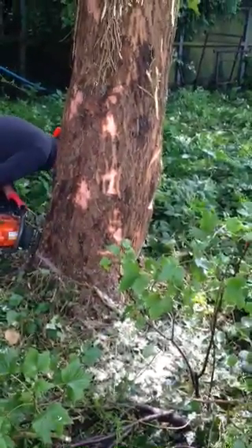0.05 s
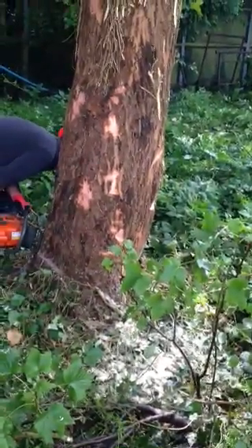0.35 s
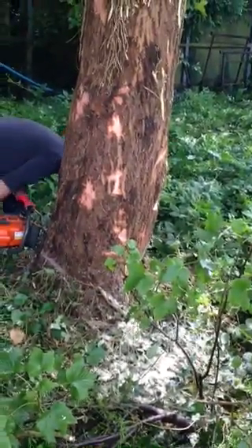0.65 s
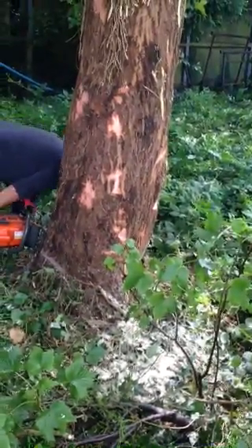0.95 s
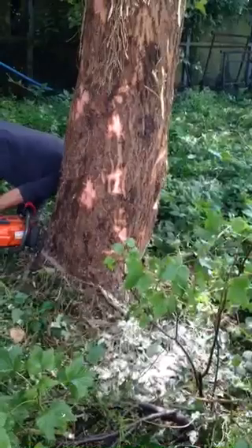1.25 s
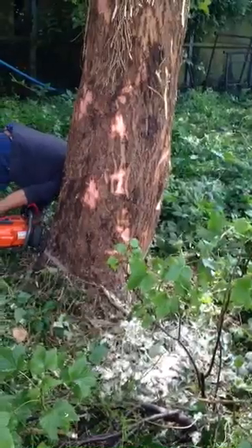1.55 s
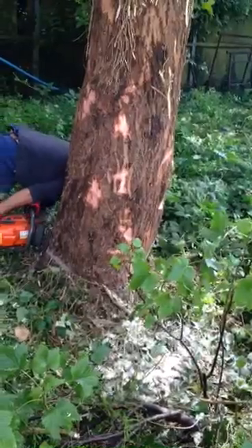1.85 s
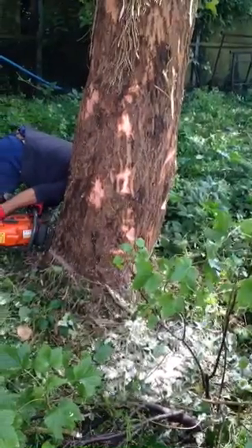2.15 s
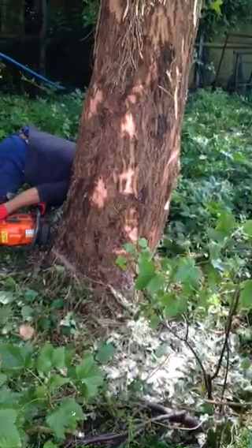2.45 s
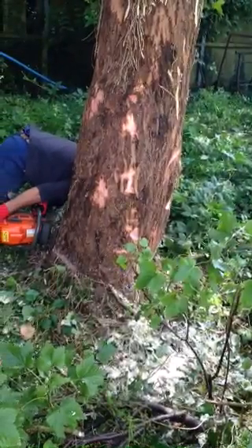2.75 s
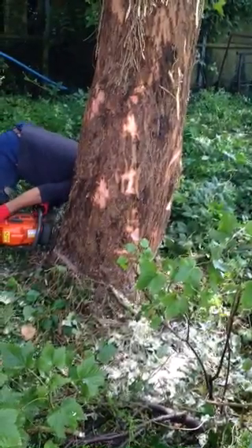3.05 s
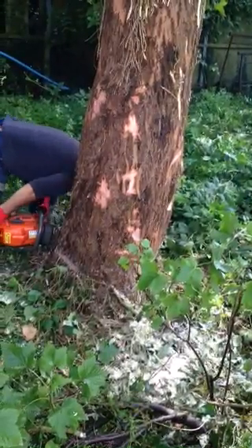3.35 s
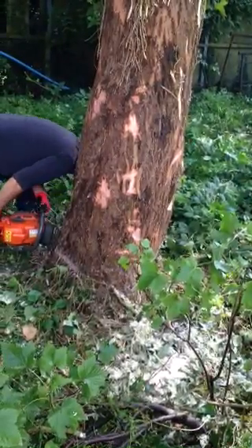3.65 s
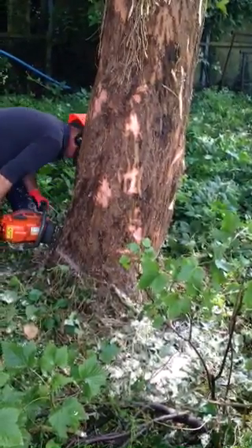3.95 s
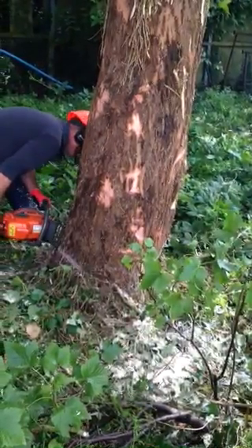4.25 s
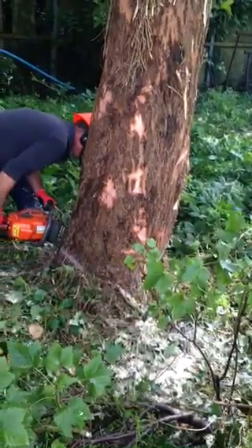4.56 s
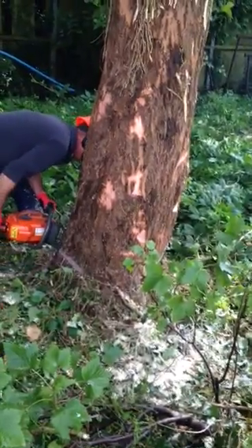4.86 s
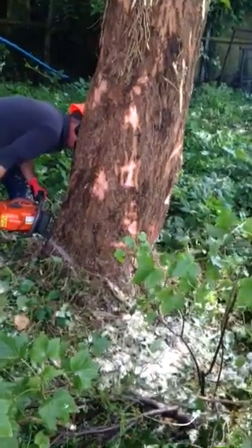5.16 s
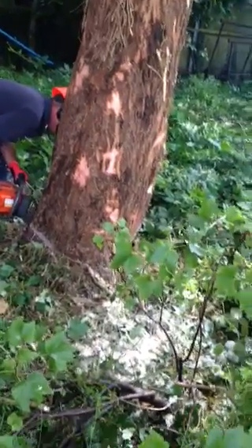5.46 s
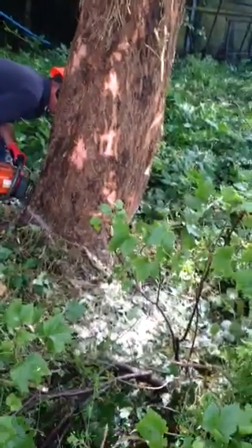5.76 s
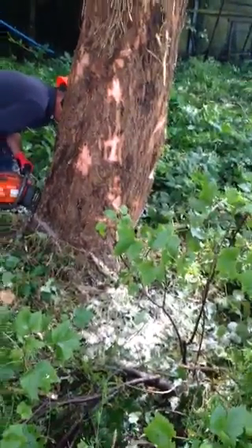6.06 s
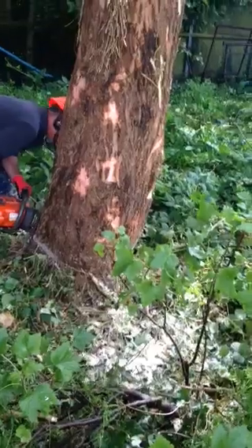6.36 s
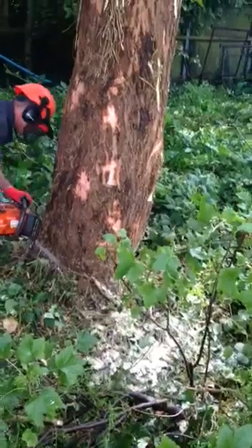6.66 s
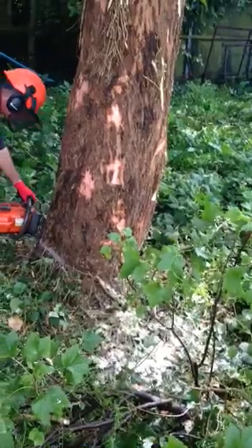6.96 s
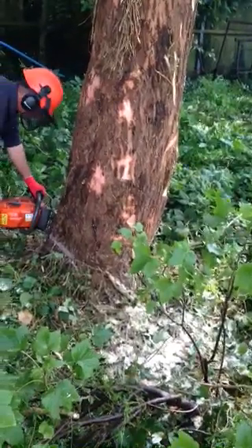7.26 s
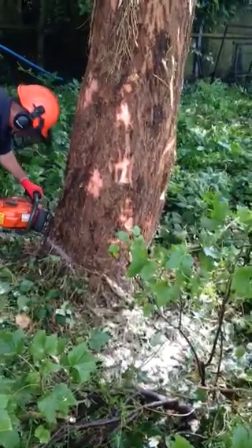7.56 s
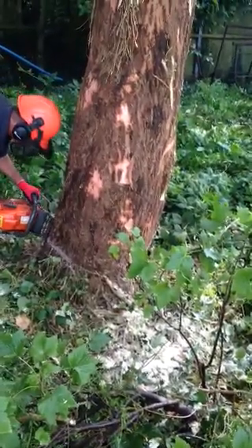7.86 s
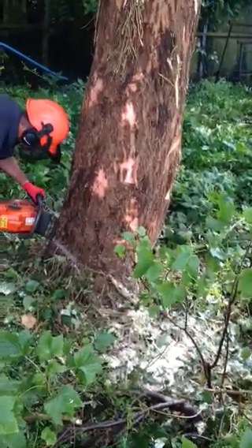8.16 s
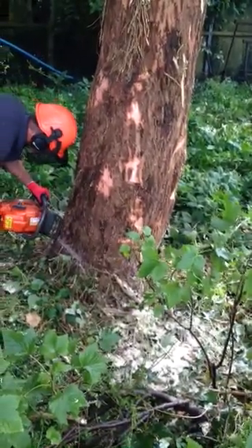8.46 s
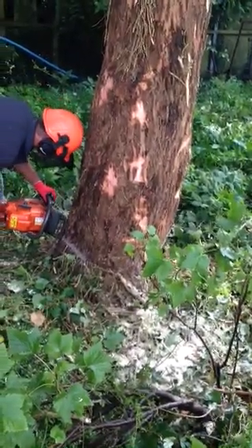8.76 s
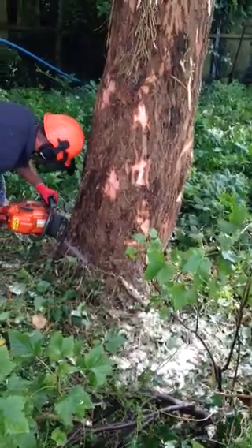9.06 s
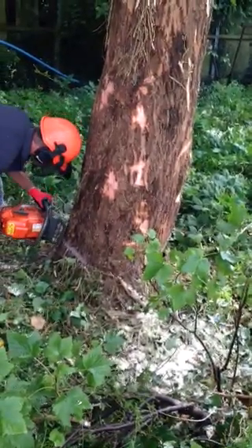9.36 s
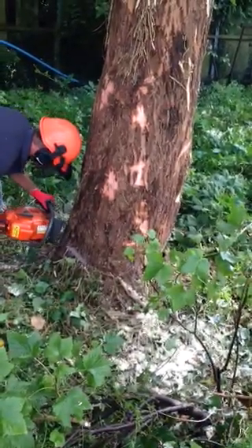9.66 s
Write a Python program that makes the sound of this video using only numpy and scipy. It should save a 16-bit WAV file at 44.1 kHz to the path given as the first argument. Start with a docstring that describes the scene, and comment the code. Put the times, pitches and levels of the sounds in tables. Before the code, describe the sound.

A chainsaw revs, drops to a stumbling idle, revs again, blips twice, then cuts into a tree trunk outdoors.

```python
"""First you hear a two-stroke chainsaw revving up, a few metres away at the foot of a tree in a garden.
It falls to a stumbling idle, revs again, gives two short blips, then bites into the trunk and labours.
Each turn of the engine's shaft (the crank) puffs gas through the muffler, rattles the metal casing
and spins the whining fan and the hissing chain. Faint echoes and a low rumble lie behind it, in mono."""
import sys
import numpy as np
from scipy import signal
from scipy.fft import rfft, irfft, next_fast_len
from scipy.io import wavfile
from scipy.ndimage import uniform_filter1d

SR = 44100
rng = np.random.default_rng(int(sys.argv[2]) if len(sys.argv) > 2 else 0)


def master_out(mix):
    """Clip the mix to full scale and print it as 16-bit PCM to the path in sys.argv[1]."""
    frames = np.transpose(np.atleast_2d(mix))
    ceiling = np.clip(frames, -1, 1)
    pcm = np.round(ceiling * 32767).astype(np.int16)
    wavfile.write(sys.argv[1], SR, pcm)


N = 432621
TIME = np.arange(N) / SR
IDLE_TURNS_PER_S = 38.5
BITE_S, FULL_LOAD_S = 8.1, 8.96   # the teeth touch the trunk, then dig in fully


# low notes at which the muffler and air box ring: (pitch [Hz], width [Hz], level [dB])
BOOM_RINGS = [(70, 93, -16.5), (162.6, 44, 1), (210, 75, -2.5)]
# the muffler's higher, barking notes: (pitch [Hz], width [Hz], level [dB])
BARK_RINGS = [(282, 23, 0), (326, 36, -3), (547, 420, -3), (654.4, 52, 9), (745, 41, 4.5)]

def exhaust(turns, firing, racing, boom_db, bark_db):
    """Once a turn, a puff of swirling gas rings the muffler's chambers; misfires are ragged and thin."""
    puffs = pulses(turns, spread_db=.45, jitter_s=.000006)
    swirl = .006 * fade(puffs, .003) * rng.standard_normal(N)
    growl = 1.4 * cut(puffs * (firing - 1), 500, "high", order=4)
    start_s, end_s, fade_s = .365, .46, .04   # the first rev overshoots and the engine misfires
    misfiring = np.clip(1 + np.minimum(TIME - start_s, end_s - TIME) / fade_s, 0, 1)
    ragged = cut(pulses(turns, spread_db=4, jitter_s=.00008), 520, "high", order=6)
    blasts = (1 - misfiring) * (puffs + growl) + misfiring * ragged
    boom = steady(cut(resonate(puffs + swirl, BOOM_RINGS), 214, "low", order=4))
    bark = cut(resonate(blasts + swirl, BARK_RINGS), 723, "low", order=6)
    bark = steady(cut(bark, 290, "high", order=4))
    return from_db(boom_db - 10 + 2 * racing) * boom + from_db(bark_db - 2.45 + 2.7 * racing) * bark


# how fast the crank spins in the two revs and the cut: (time [s], speed [turns/s])
FIRST_REV_SPEED = [(0.0, 93.8), (0.068, 114.4), (0.148, 138.5), (0.252, 167.7), (0.38, 187.3),
                   (0.48, 180.7), (0.654, 162.3), (0.698, 154.7), (0.822, 128.2), (0.992, 92.5),
                   (1.12, 69.5)]
SECOND_REV_SPEED = [(4.199, 45.3), (4.3, 64.73), (4.406, 76.14), (4.59, 122), (4.698, 150.1),
                    (4.862, 172.8), (5.0, 180.4), (5.072, 175.7), (5.174, 153.1), (5.336, 121.5),
                    (5.412, 100.6), (5.5, 83.4)]
CUTTING_SPEED = [(7.5, 40.2), (7.56, 51.7), (7.61, 61.8), (7.65, 69.8), (7.74, 75.6), (7.9, 110),
                 (7.949, 127.9), (7.991, 145), (8.1, 172.8), (8.24, 184.5), (8.601, 185.3), (8.72, 182.5),
                 (8.95, 162.2), (9.04, 169), (9.15, 181.2), (9.24, 177.5), (9.42, 159.1), (9.81, 144.7)]
# two blips, just up to where the clutch grips: (top reached [s], held for [s], speed [turns/s])
SHORT_BLIPS = [(5.96, 0.06, 73.5), (6.315, .055, 73.5)]

def crank_speed():
    """The engine picks up into each rev or blip, then coasts back to idle."""
    pickup = 195   # turns per second gained each second
    coast_s, coast_towards = .35, 20   # it slows towards this many turns/s until the idle catches it
    speed = np.full(N, IDLE_TURNS_PER_S)
    blips = [[(s, top), (s + held, top)] for s, held, top in SHORT_BLIPS]
    for rev in [FIRST_REV_SPEED, SECOND_REV_SPEED, CUTTING_SPEED] + blips:
        before, after = np.maximum(rev[0][0] - TIME, 0), np.maximum(TIME - rev[-1][0], 0)
        driven = look_up(rev, TIME) - pickup * before
        speed = np.maximum(speed, coast_towards + (driven - coast_towards) * np.exp(-after / coast_s))
    return uniform_filter1d(speed, size=1500)   # the heavy flywheel smooths every change


def crank_turns(speed, knock_s):
    """Count the crank's turns, wavering a little; each idle firing falls on a whole turn."""
    turns = np.cumsum(speed * (1 + .00287 * drift(45))) / SR
    nudges = np.unwrap(np.interp(knock_s, TIME, turns), period=1)
    return turns - np.interp(TIME, knock_s, nudges)


# pulls on the trigger: (start [s], rise [s], let go [s], fall [s], opening [0-1])
TRIGGER_PULLS = [(-.1, 0.042, 0.56, .14, 1), (4.175, 0.041, 4.96, .15, 1), (5.78, 0.09, 6.0, 0.055, 0.78),
                 (6.18, 0.05, 6.32, 0.045, 0.81), (7.48, 0.064, 9.9, .1, 1)]

def throttle():
    """How far the throttle is open: each pull of the trigger rises, holds and falls."""
    return sum(opening * np.clip(np.minimum((TIME - start) / rise, 1 - (TIME - let_go) / fall), 0, 1)
               for start, rise, let_go, fall, opening in TRIGGER_PULLS)


# engine loudness, throttle open and shut: (speed [turns/s], boom [dB], bark [dB], clatter [dB])
OPEN_LEVELS = [(44.6, -14.5, -17, -29), (68.4, -8.5, -15, -25), (98, -13.5, -9, -20),
               (138, -19.5, -14.5, -14.5), (165, -25.5, -11, -21), (179.5, -24, -14.5, -20),
               (183.2, -33, -14.5, -16.5)]
SHUT_LEVELS = [(36, -59, -46, -37), (45.4, -50, -34, -36.5), (57.5, -39, -34, -30),
               (90.5, -38.5, -35.5, -30.5), (132, -23, -42, -29), (157, -18, -24, -22.5)]

def engine_loudness(speed):
    """Boom, bark and clatter in dB follow the speed, the throttle and the depth of the cut."""
    opening = throttle()
    cutting_s = np.maximum(TIME - BITE_S, 0)
    sinking_db_per_s = (2.5, -4, -4)   # boom grows, bark and clatter fade as the saw sinks in
    return [opening * look_up(OPEN_LEVELS, speed, column)
            + (1 - opening) * look_up(SHUT_LEVELS, speed, column) + slope * cutting_s
            for column, slope in enumerate(sinking_db_per_s, start=1)]


def stutter(turns, speed):
    """Near top speed, or as the teeth skim the wood, every other firing is weaker: a deeper growl."""
    skimming = np.interp(TIME, [BITE_S, BITE_S + .08, FULL_LOAD_S - .06, FULL_LOAD_S], [0, 1, 1, 0])
    overspeed = np.interp(speed, [176, 186], [.06, .8])
    depth = .33 * np.maximum(skimming, overspeed) * (1 + .45 * drift(40))
    return 1 + depth * np.cos(np.pi * turns)


# runs of hard knocks at idle: (start [s], knocks [count], level [dB])
HARD_KNOCK_RUNS = [(1.305, 1, -14), (1.392, 5, -18.5), (1.808, 1, -17.5), (2.408, 1, -18),
                   (2.543, 1, -16.5), (2.649, 3, -16), (2.9, 4, -16), (3.385, 1, -15.5), (3.465, 1, -13.5),
                   (3.545, 1, -14.5), (3.675, 1, -15.5), (3.831, 5, -14.5), (4.206, 1, -14),
                   (4.249, 1, -7.5), (5.836, 1, -17), (6.224, 1, -7), (6.645, 1, -20), (6.72, 2, -17.5),
                   (6.847, 6, -16), (7.397, 1, -18), (7.498, 1, -17), (7.548, 1, -19)]

def idle_firings(speed):
    """Times and levels of the idle's firings: hard ones every third turn, soft ones every second turn."""
    hard_gap_s, soft_gap_s, soft_db = .076, 2 / IDLE_TURNS_PER_S, -19.5
    rows = []
    for start, knocks, db in HARD_KNOCK_RUNS:
        last = rows[-1][0] if rows else start
        between = np.linspace(last, start, int((start - last) / soft_gap_s + .2) + 1)[1:-1]
        rows += [(s, soft_db) for s in between if speed[int(s * SR)] < IDLE_TURNS_PER_S + 1]
        rows += [(start + k * hard_gap_s, db) for k in range(round(knocks))]
    s, db = np.transpose(rows)
    return s, db - rng.standard_normal(len(s))


# the tone colour of a knock's crack: (pitch [Hz], level [dB])
CRACK_COLOUR = [(100, -28), (700, 15.5), (1000, -4), (2200, 4.5), (4000, -3.5), (7000, -6), (12000, -6),
                (15500, -6)]
# how the muffler rings after a lone firing: (pitch [Hz], width [Hz], level [dB])
PUTT_RINGS = [(490, 180, 30), (760, 150, 30)]

def idle_knocks(knock_s, knock_db, racing):
    """Each lone firing gives a sharp crack, a ring of metal and a putt from the muffler."""
    hits = np.zeros(N)
    hits[(knock_s * SR).astype(int)] = from_db(knock_db)
    hits *= (1 - racing) ** 2
    crack = (fade(hits, .0072) + .07 * fade(hits, .069)) * noise(CRACK_COLOUR)
    ring = resonate(fade(hits, .0063) * rng.standard_normal(N), CASING_RINGS)
    return from_db(-9.5) * crack + from_db(-1) * ring - resonate(hits, PUTT_RINGS)


# the tones in the piston's hum: (multiple of crank speed [x], level [dB])
HUM_TONES = [(2, -4.5), (3, -3), (4, 3.5), (6, -2.5), (7, -13.5), (8, -7.5)]
# how well the saw's body gives off that hum: (pitch [Hz], level [dB])
BODY_COLOUR = [(75, -15), (120, -4.5), (152, 5.5), (200, -2.5), (240, -18), (340, -29), (450, 2), (650, 9),
               (770, 18), (900, -46)]
# how loud the hum is: (speed [turns/s], level [dB])
HUM_LEVEL = [(40, -47.5), (60, -37.5), (90, -37), (130, -41.5), (170, -53.5)]
# the muffler's low gulp and its hollow ring at idle: (pitch [Hz], width [Hz], level [dB])
GULP_RINGS = [(170, 150, 11.5)]
HOLLOW_RINGS = [(691, 50, 12.5), (778, 76, 9)]

def piston(turns, speed, knock_s, racing):
    """The pumping piston hums; at idle every turn rings the muffler, and each unfired turn gulps."""
    stroke = turns - .1454   # it pumps just after the firing point
    hum = 0
    for multiple, db in HUM_TONES:
        tone_db = db + look_up(BODY_COLOUR, multiple * speed) + 1.2 * drift(14)
        hum += from_db(tone_db) * np.cos(2 * np.pi * round(multiple) * stroke)
    unfired = ~np.isin(np.round(turns), np.round(np.interp(knock_s, TIME, turns)))
    idling = (1 - racing) ** 2
    gulps = pulses(stroke, spread_db=2, jitter_s=.0001) * unfired * idling
    chuffs = pulses(stroke + .5, spread_db=2, jitter_s=.0003) * idling
    gulping = cut(resonate(gulps, GULP_RINGS), 380, "low")
    return from_db(look_up(HUM_LEVEL, speed)) * hum + gulping + resonate(chuffs, HOLLOW_RINGS)


# notes of the engine case and the bar that guides the chain: (pitch [Hz], width [Hz], level [dB])
CASING_RINGS = [(1180, 1540, -10.5), (1248, 154, 2.5), (1767, 86, 3.5), (2275, 130, -3), (2620, 330, -6.5),
                (3600, 93, 3), (4410, 36, 0), (4874, 35, 0.5)]
# the tone colour of escaping gas: (pitch [Hz], level [dB])
RASP_COLOUR = [(500, -4), (900, 0.5), (1300, -6), (1750, -9), (2200, 1.5), (2800, -8), (3600, -15),
               (6000, -20)]

def casing(turns, firing, racing, bark_db, clatter_db):
    """The piston slaps the metal each turn and makes it ring, with a rasp of escaping gas after it."""
    slaps = firing * pulses(turns, spread_db=1.2, jitter_s=.000012)
    rasp = (.4 + fade(slaps, .009)) * noise(RASP_COLOUR)
    clicks = cut(cut(slaps, 1900, "high", order=4), 5200, "low")
    ringing = steady(resonate(slaps, CASING_RINGS) + .15 * clicks)
    rattle = steady(resonate(rasp, CASING_RINGS) + .26 * rasp)
    power = np.interp(bark_db, [-38, -23], [0, 1])   # under power the loose rattle tightens to a buzz
    clatter = (.3 + .35 * power) * ringing + (.85 - .33 * power) * rattle
    return from_db(clatter_db - 2 * (1 - racing)) * clatter


# how loud the running chain is: (speed [turns/s], level [dB])
RUNNING_CHAIN_LEVEL = [(36, -40.5), (41, -37), (55, -30.5), (80, -26.5), (125, -18.5), (155, -16),
                       (185, -17)]

def chain_loudness(speed, racing):
    """In dB: the chain grows louder with speed, and quieter when slack or buried in the wood."""
    slack_db = -4.5 * racing * (1 - throttle())
    buried_db = -2 * np.clip((TIME - FULL_LOAD_S) / .016, 0, 1)
    return look_up(RUNNING_CHAIN_LEVEL, speed) + slack_db + buried_db


# the tone colours of rushing links and of jingling links: (pitch [Hz], level [dB])
RUSH_COLOUR = [(1800, -4.5), (2900, -4), (3600, -2), (4700, -6.5), (6000, -7.5), (7200, -14.5),
               (10500, -15), (12500, -21), (15500, -29)]
JINGLE_COLOUR = [(2000, -23), (4000, 6), (7000, 2), (11000, -7), (12800, 6), (14000, 16), (15500, 0)]

def chain(turns, racing, chain_db):
    """Links rush round the bar and teeth snap; the shaking saw also makes the slack chain jingle."""
    beat = pulses(turns, spread_db=2, jitter_s=.000014)
    snaps = (rng.random(N) < 130 / SR) * from_db(4.8 * rng.standard_normal(N))   # about 130 a second
    surges = .45 + .4 * racing + .8 * fade(beat, .007) + .65 * fade(snaps, .0012)
    rush = steady(surges * noise(RUSH_COLOUR))
    buzz = steady(cut(resonate(beat, CASING_RINGS), 3800, "high", order=4))
    whirr = rush + .42 * racing * buzz
    tosses = pulses(turns * 3, spread_db=5, jitter_s=.0015)   # three a turn
    jingle = unit_power((.1 + fade(tosses, .002)) * noise(JINGLE_COLOUR))
    return from_db(chain_db - 3.5 + racing) * whirr + from_db(-44.5) * jingle


# notes of the bar when the chain slaps it: (pitch [Hz], width [Hz], level [dB])
BAR_RINGS = [(1770, 260, 0), (2740, 170, -6)]

def chain_flap(turns, speed):
    """Around 118 turns a second the chain flaps against the bar and makes it rasp."""
    slaps = fade(pulses(turns, spread_db=3, jitter_s=.0002), .004) * rng.standard_normal(N)
    nearness = np.exp(-.5 * ((speed - 118) / 16) ** 2)
    rasp = steady(resonate(resonate(slaps, BAR_RINGS), BAR_RINGS))
    return from_db(-17.5 - 10 * (1 - throttle())) * nearness * rasp


# the fan's main tones and its highest ones: (multiple of crank speed [x], level [dB])
MAIN_FAN_TONES = [(16, -1.5), (20, -3), (22, 3.5)]
HIGH_FAN_TONES = [(24, -7.5), (26, -6)]
# how well the fan's cover gives off the whine: (pitch [Hz], level [dB])
COVER_COLOUR = [(1400, -12), (1780, 3), (2050, -9), (2500, -2.5), (2780, -4.5), (3050, -9), (3290, -0.5),
                (3480, 3), (3750, -5.5), (3980, 0.5), (4200, -7), (4820, 0.5)]
# how the main tones swell and dip: (time [s], level [dB])
MAIN_FAN_LEVEL = [(0.25, 2), (0.64, 2), (0.8, 3), (8.27, 1), (8.37, -11), (8.62, -5), (8.74, -0.5),
                  (9.02, -6), (9.8, 1.5)]

def fan(turns, speed, chain_db):
    """The fan's blades whine, loudest where the cover rings; rougher and weaker with the throttle shut."""
    shut = 1 - throttle()
    waver_radians = .3 + .3 * shut

    def blade_tone(multiple, db):
        """One tone in step with the crank, wavering and slowly swelling."""
        angle = 2 * np.pi * ((round(multiple) * turns + rng.random()) % 1) + waver_radians * drift(150)
        gain = from_db(db + look_up(COVER_COLOUR, multiple * speed))
        return gain * (1 + .12 * drift(16)) * np.sin(angle)

    main = sum(blade_tone(*row) for row in MAIN_FAN_TONES)
    high = sum(blade_tone(*row) for row in HIGH_FAN_TONES)
    whine = from_db(look_up(MAIN_FAN_LEVEL, TIME)) * main + high
    swirl = 1 + (.4 + .2 * shut) * drift(420) + .2 * drift(30)
    spun_up = np.clip(speed / 50 - 1, 0, 1)
    return from_db(chain_db - 3 - 1.5 * shut) * spun_up * swirl * whine


# how loud the chain's drive wheel buzzes: (speed [turns/s], level [dB])
SPROCKET_LEVEL = [(55, -62), (90, -41), (140, -30), (185, -27)]

def sprocket(turns, speed, firing):
    """Links meet the toothed drive wheel in step with the crank: a clean buzz of the same shape each turn,
    weaker on every other turn when the engine stutters."""
    angle = np.linspace(0, 1, 2048)
    odd_db, db_per_octave = -1, -3.5
    one_turn = 0
    for multiple in range(7, 33):
        db = odd_db * (multiple % 2) + db_per_octave * np.log2(multiple / 7)
        one_turn += from_db(db) * np.sin(2 * np.pi * (multiple * angle + rng.random()))
    buzz = np.interp(turns % 1, angle, one_turn)
    slack_db = -14.5 * (1 - throttle())
    return from_db(look_up(SPROCKET_LEVEL, speed) + slack_db) * firing ** 2 * buzz


# notes of the loose clutch drum: (pitch [Hz], time to fade by 60 dB [s], level [dB])
DRUM_NOTES = [(2330, 0.06, 15), (4070, 0.09, 2), (5400, 0.14, 4), (5900, .09, 0.5), (7660, .1, -4),
              (8380, 0.12, -7), (12000, .12, 2.5)]
# square hits on the drum: (time [s], level [dB], brightness [dB per octave])
DRUM_CLINKS = [(3.053, -39.5, -3), (3.388, -51, -5), (3.546, -44, 0), (3.91, -43, 4), (4.062, -42, -2)]

def clutch(knock_s, knock_db):
    """The clutch's metal drum chimes faintly after every knock, and clinks when struck squarely."""
    faint = np.column_stack([knock_s, knock_db - 32, 3 * rng.standard_normal(len(knock_s))])
    s, db, brightness = np.vstack([faint, DRUM_CLINKS]).T
    chime = 0
    for hz, ring_s, note_db in DRUM_NOTES:
        strength = from_db(db + note_db + brightness * np.log2(hz / 3500))
        hits = np.bincount((s * SR).astype(int), strength, N)
        decay, step = from_db(-60 / (ring_s * SR)), 2 * np.pi * hz / SR
        chime += signal.lfilter([0, np.sin(step)], [1, -2 * decay * np.cos(step), decay ** 2], hits + 1e-18)
    return chime


# echoes from trunk, ground and fence: (delay [s], level [dB])
GARDEN_ECHOES = [(.0083, -18), (.029, -33)]

def garden(x):
    """The garden adds dull echoes and a short scatter from leaves and fence."""
    dull = cut(x, 2500, "low")
    echoes = sum(from_db(db) * np.interp(TIME - delay, TIME, dull, left=0) for delay, db in GARDEN_ECHOES)
    scatter = (rng.standard_normal(N) * from_db(-60 * TIME / .14))[:SR // 2]
    leaves = signal.fftconvolve(cut(x, 780, "high"), scatter / np.linalg.norm(scatter))[:N]
    return x + echoes + from_db(-8) * leaves


# the tone colour of the outdoor rumble: (pitch [Hz], level [dB])
RUMBLE_COLOUR = [(20, -22), (35, -18), (60, -1), (85, -8), (130, -6.5), (400, -14), (4000, -34.5)]

def rumble(speed, racing, boom_db):
    """A low outdoor rumble; a heavy flow of exhaust adds to it."""
    flow_db = boom_db - 23 + np.interp(speed, [120, 165], [0, -9])
    return (from_db(-39 - 8.5 * racing) + from_db(flow_db)) * noise(RUMBLE_COLOUR)


def from_db(db):
    """Turn decibels into a number to multiply by."""
    return 10 ** (np.asarray(db) / 20)


def look_up(table, at, column=1):
    """Read a table between its rows; 'at' is a place in its first column."""
    columns = np.transpose(table)
    return np.interp(at, columns[0], columns[column])


def unit_power(x):
    """Scale a sound so that its average power is one."""
    return x / np.sqrt(np.mean(x ** 2) + 1e-20)


def steady(x, size=2300):
    """Hold the power at one over a few turns, so that a level curve can set it."""
    return x / np.sqrt(np.abs(uniform_filter1d(uniform_filter1d(x * x, size), size)) + 1e-14)


def noise(colour):
    """Noise of power one, with the given tone colour."""
    hz, db = np.transpose(colour)
    size = next_fast_len(N)
    bin_hz = np.maximum(np.fft.rfftfreq(size, 1 / SR), 1)
    gain = from_db(np.interp(np.log(bin_hz), np.log(hz), db)) * np.minimum(bin_hz / hz[0], 1) ** 2
    return unit_power(irfft(rfft(rng.standard_normal(size)) * gain, size)[:N])


def drift(rate):
    """A random wander that heads for a new value 'rate' times a second."""
    values = rng.standard_normal(8192)
    return np.interp(TIME * rate, np.arange(len(values)), values)


def cut(x, hz, keep, order=2):
    """Keep the "low" or "high" side of a pitch; a higher order cuts more steeply."""
    return signal.sosfilt(signal.butter(order, hz, keep, fs=SR, output="sos"), x + 1e-18)


def resonate(x, rings):
    """Ring several notes at once, every other one upside down; narrow ones ring longer."""
    out = 0
    for k, (hz, width, db) in enumerate(rings):
        decay = np.exp(-np.pi * width / SR)
        feedback = [1, -2 * decay * np.cos(2 * np.pi * hz / SR), decay ** 2]
        note = (1 - decay ** 2) / 2 * signal.lfilter([1, 0, -1], feedback, x + 1e-18)
        out += (-1) ** k * from_db(db) * note
    return out


def fade(clicks, seconds):
    """Give each click a tail that dies away."""
    return signal.lfilter([1], [1, -np.exp(-1 / (seconds * SR))], clicks + 1e-18)


def pulses(turns, spread_db, jitter_s):
    """One click per turn, uneven in strength and timing."""
    at = np.interp(np.arange(np.floor(turns[0]), turns[-1]), turns, np.arange(N))
    chance = np.random.default_rng(rng.integers(2 ** 31)).standard_normal((len(at), 2))
    at = np.clip(at + chance[:, 0] * jitter_s * SR, 0, N - 2)
    strength = from_db(spread_db * chance[:, 1])
    whole, part = at.astype(int), at % 1   # each click is shared between two samples
    return np.bincount(whole, strength * (1 - part), N) + np.bincount(whole + 1, strength * part, N)


def scene():
    """The saw in the garden over a low rumble, the same in both channels."""
    smooth_speed = crank_speed()
    knock_s, knock_db = idle_firings(smooth_speed)
    turns = crank_turns(smooth_speed, knock_s)
    speed = uniform_filter1d(np.gradient(turns) * SR, size=1500)   # with the idle's stumble
    racing = np.clip((speed - 40) / 45, 0, 1)   # 0 at idle, 1 once the clutch grips
    firing = stutter(turns, speed)
    boom_db, bark_db, clatter_db = engine_loudness(speed)
    chain_db = chain_loudness(speed, racing)
    engine = exhaust(turns, firing, racing, boom_db, bark_db)
    engine += piston(turns, speed, knock_s, racing) + idle_knocks(knock_s, knock_db, racing)
    metal = casing(turns, firing, racing, bark_db, clatter_db)
    metal += chain(turns, racing, chain_db) + chain_flap(turns, speed)
    whine = fan(turns, speed, chain_db) + sprocket(turns, speed, firing)
    mono = garden(engine + metal) + whine + clutch(knock_s, knock_db) + rumble(speed, racing, boom_db)
    return np.array([mono, mono])


def record(dry):
    """Round off the loudest peaks and remove the treble above 15700 Hz."""
    rounded = .98 * np.tanh(dry / 1.245)
    return signal.sosfilt(signal.ellip(10, .1, 80, 15700, fs=SR, output="sos"), rounded)


dry = scene()
out = record(dry)
master_out(out)
```